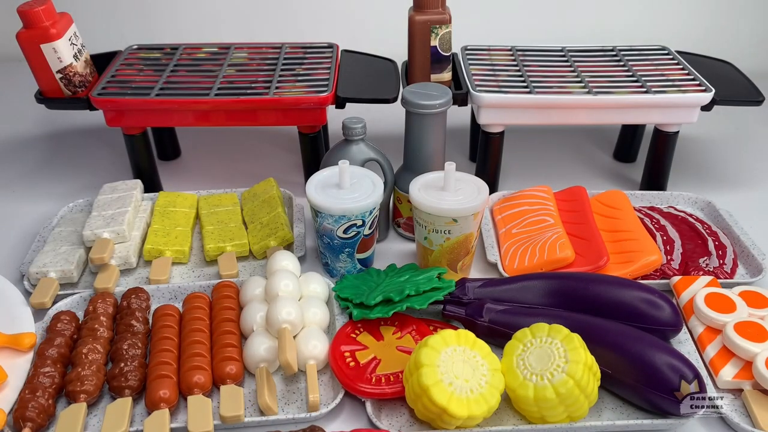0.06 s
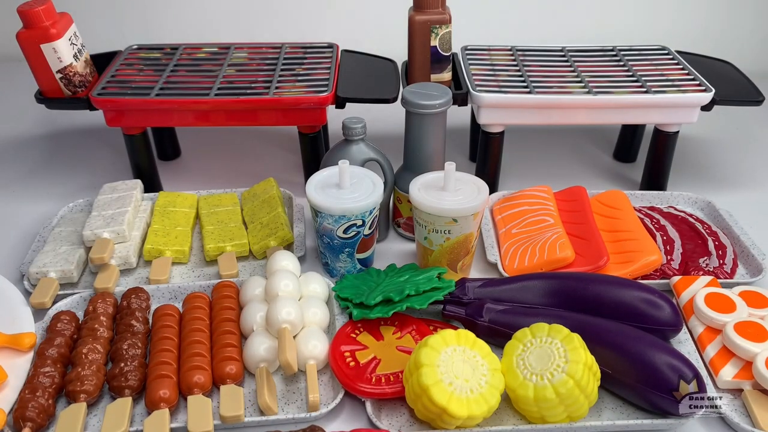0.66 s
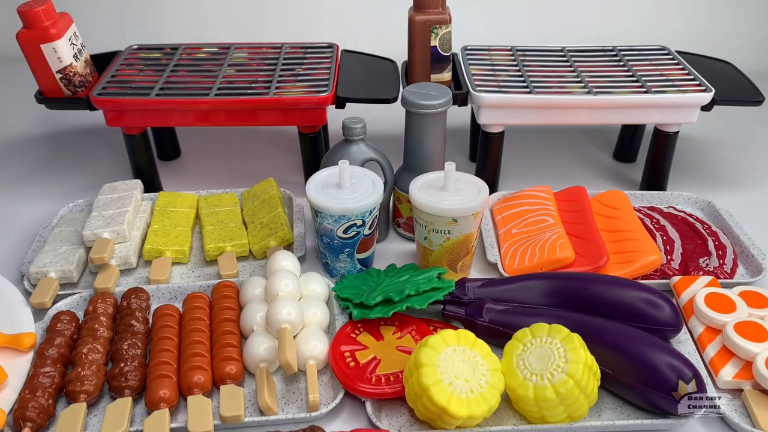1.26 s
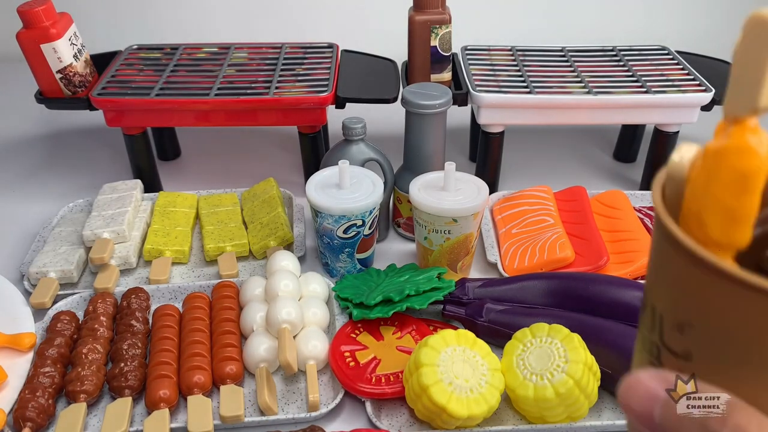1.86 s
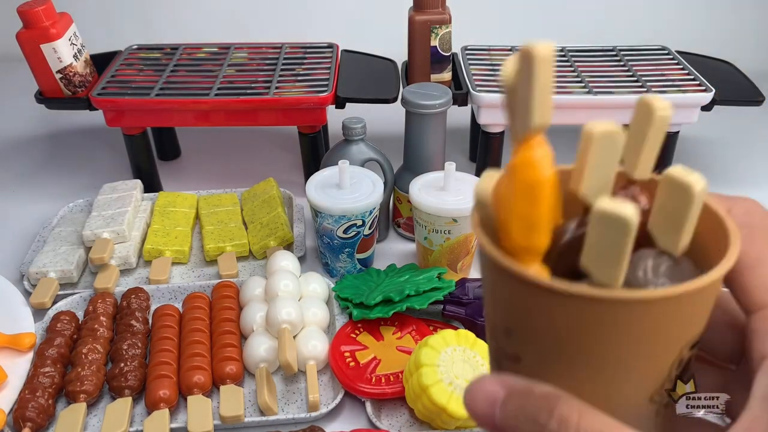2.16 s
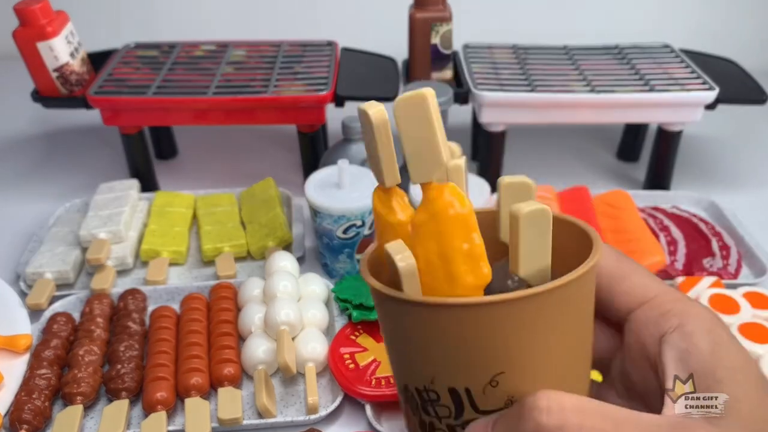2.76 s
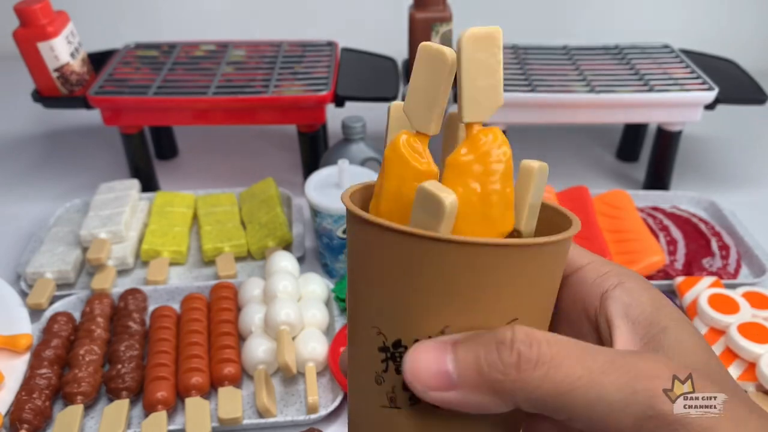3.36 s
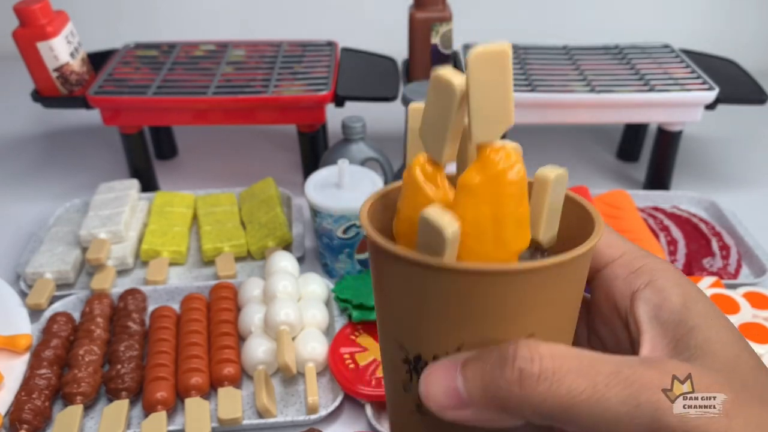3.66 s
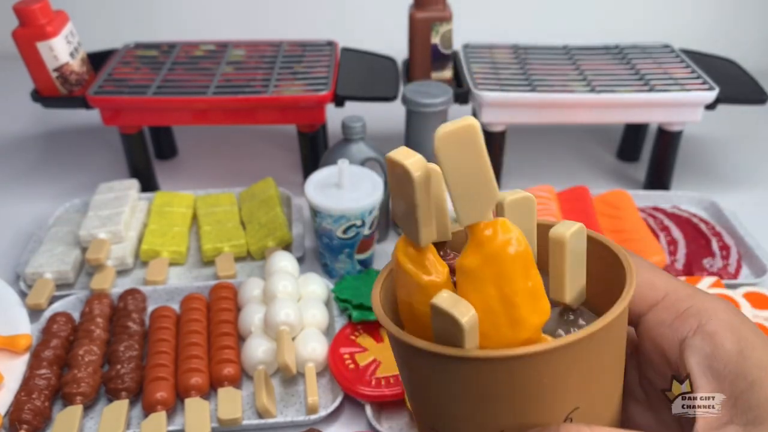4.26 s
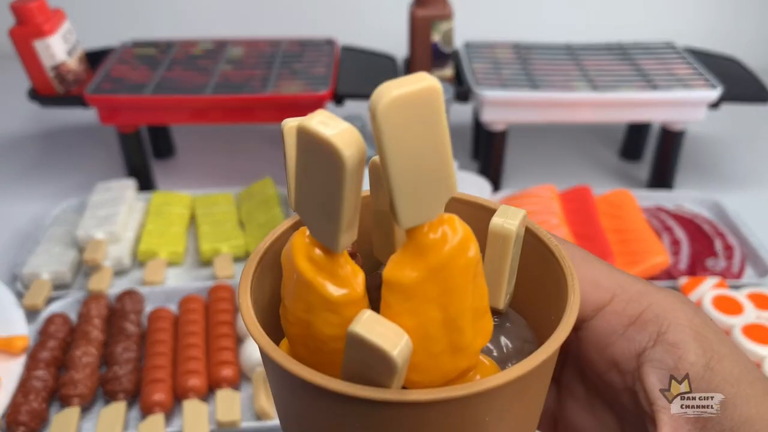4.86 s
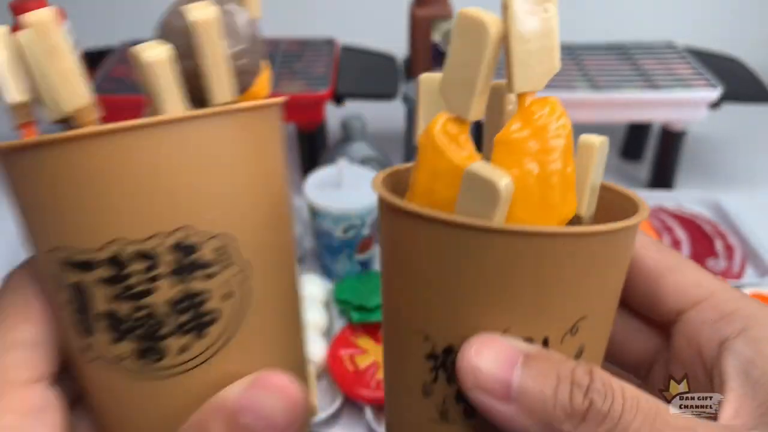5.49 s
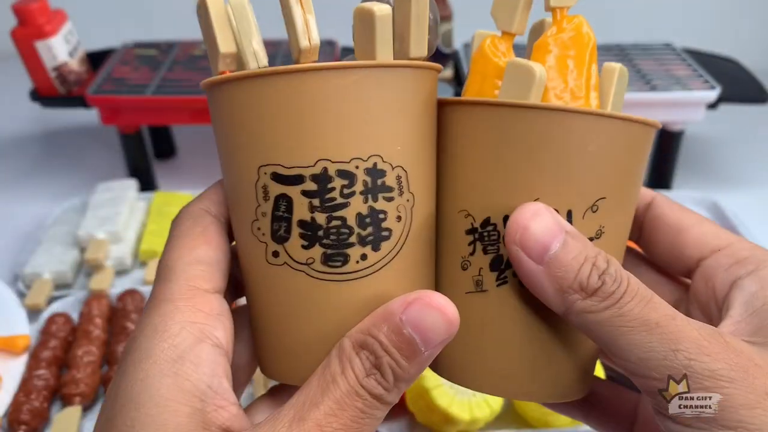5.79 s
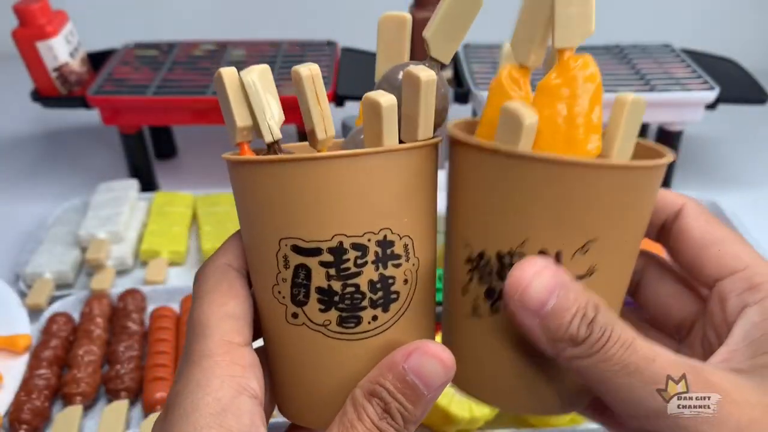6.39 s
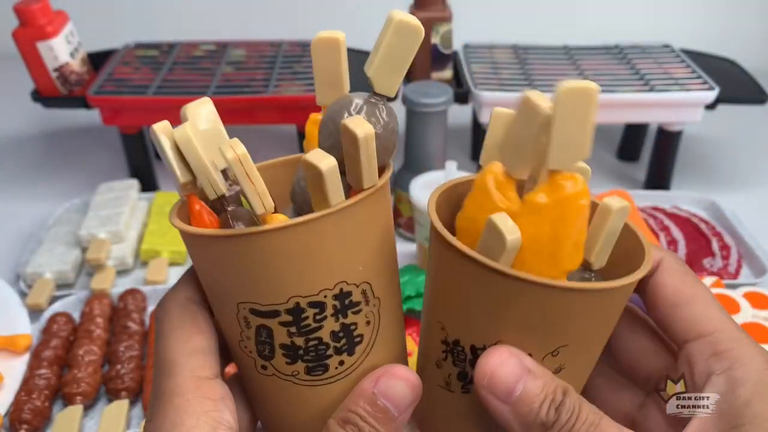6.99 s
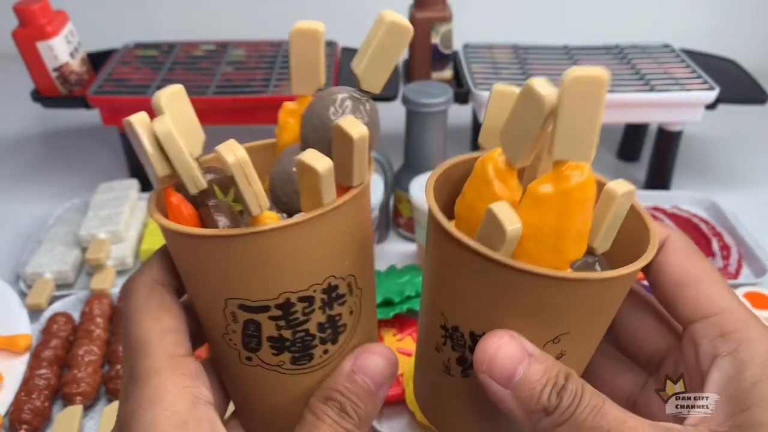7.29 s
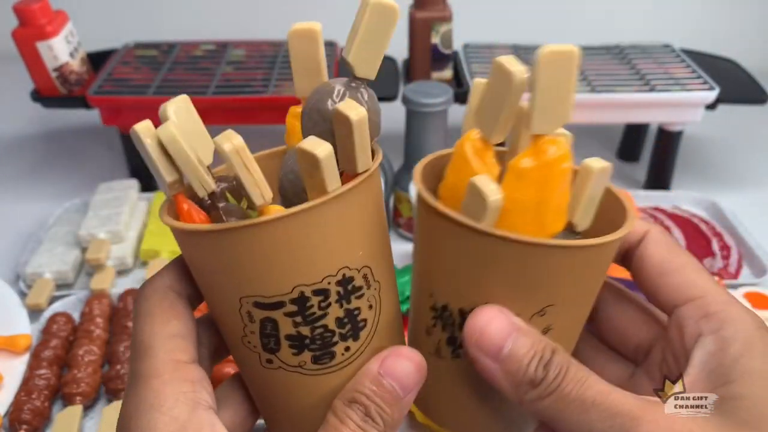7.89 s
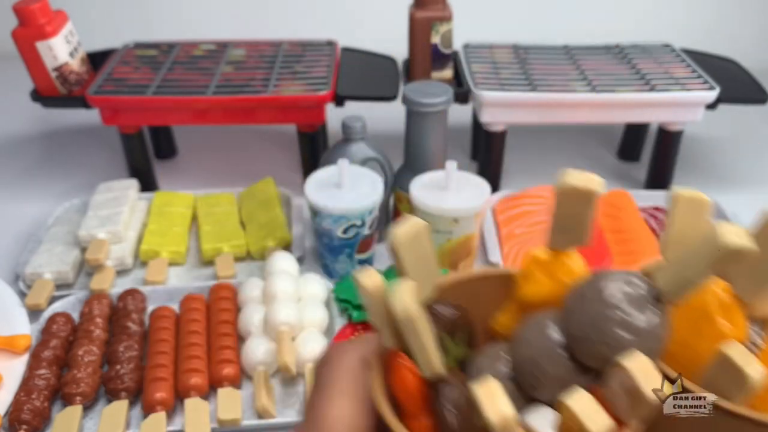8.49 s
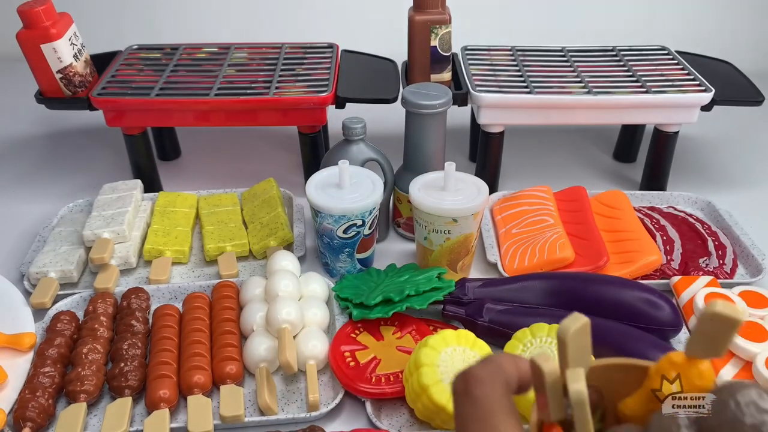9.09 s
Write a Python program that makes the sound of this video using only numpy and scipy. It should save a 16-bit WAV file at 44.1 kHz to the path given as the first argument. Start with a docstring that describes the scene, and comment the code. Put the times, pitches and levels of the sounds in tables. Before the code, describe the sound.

A small, quiet room holds a faint low rumble and hiss, with a soft swish and click around 0.5 seconds. From about 1 second, hollow plastic toy skewers clatter in a paper cup close to the microphone, slightly dull at first, with a light table bump near 1.5 seconds. Brighter, irregular clicks and small tumbles continue until 3 seconds and return from 3.4 to 4.2. Then fingers softly rub and drag on the paper, with a few sparse ticks. A brief swish near 5.7 seconds brings in a second cup, and louder, hollower clatter follows from 6 to 7 seconds. Lighter taps build to another strong rattle around 8.2 seconds. At about 8.8 seconds a cup lands on the table with a firm knock and low thud, then scrapes briefly as it slides. Each contact has a short room echo.

```python
"""Hollow plastic toy skewers clatter in two paper cups, lifted, turned and shaken close to a phone's mics.
Each contact rings the plastic and the cup's wall and hollow; fingers rub and drag on the paper.
An arm bumps the table now and then, and at the end a cup is put down on it and slid.
The place is a small, quiet room with a short echo, a low building rumble and a faint hiss."""
import sys
import numpy as np
from scipy import signal
from scipy.fft import rfft, irfft, next_fast_len
from scipy.io import wavfile
from scipy.ndimage import uniform_filter1d, map_coordinates

SR = 44100
rng = np.random.default_rng(int(sys.argv[2]) if len(sys.argv) > 2 else 0)


def generate_wav(signal):
    """Clip the signal to [-1, 1] and save it as 16-bit WAV at the path in sys.argv[1]."""
    frames = np.transpose(np.atleast_2d(signal))
    scaled = np.clip(frames, -1, 1) * 32767
    pcm = np.round(scaled).astype(np.int16)
    wavfile.write(sys.argv[1], SR, pcm)


N = 403074

# A skewer's plastic body. Each row: frequency in Hz, relative level in dB per Hz.
CLACK_SPECTRUM = [(100, -25.5), (250, -13.5), (500, 2), (800, -5.5), (1250, 3.5), (1900, 7), (2350, 0.5),
                  (3100, 3.5), (3700, 1.5), (4500, 5.5), (5600, -10.5), (7000, -9), (10000, -44.5)]
# A rubbed paper cup. Each row: frequency in Hz, relative level in dB per Hz.
PAPER_SPECTRUM = [(200, -22.5), (600, -8), (890, 8), (1070, 15.5), (1300, 8.5), (1700, 0.5), (2300, -4.5),
                  (3000, 3.5), (4000, 4.5), (5200, 2), (7000, 0.5), (10000, -6), (14000, -14.5),
                  (16000, -38)]
# The table top. Each row: frequency in Hz, level in dB, t60 in seconds.
TABLE_MODES = [(57.3, -33, 0.7), (83.5, -33, 0.66), (106, -30, 0.19), (174, -16.5, 0.16),
               (216.5, -26, 0.25), (279.3, -24.5, 0.24), (326, -26, 0.14), (394, -27, 0.16),
               (787, -47, 0.2), (975, -45, .12)]


def amp(db):
    return 10 ** (np.asarray(db) / 20)


def unit(x):
    return x / np.sqrt(np.mean(x ** 2) + 1e-20)


def along(points, hz):
    """Read (Hz, value) points on a log axis."""
    f, v = np.transpose(points)
    return np.interp(np.log(hz + 1), np.log(f), v)


def curve(rows):
    """(seconds, value) rows as one value per sample."""
    return np.interp(np.arange(N) / SR, *np.transpose(rows))


def wobble(rate):
    """A smooth random curve, rate knots a second."""
    knots = rng.standard_normal(int(N * rate / SR) + 4)
    steps = np.arange(0, len(knots) - 1, 1 / 10)
    return np.interp(np.arange(N) * rate / SR, steps, map_coordinates(knots, [steps]))


def swell(s, half):
    """A smooth rise and fall around time s."""
    return np.exp(-np.minimum(((np.arange(N) / SR - s) / half) ** 2, 30))


def decay(t, t60, attack):
    """A quick rise and an exponential fall."""
    return np.exp(-np.log(1000) * t / t60) * (1 - np.exp(-t / attack))


def add(out, s, x):
    """Mix x in from time s."""
    part = out[:, round(s * SR):][:, :x.shape[-1]]
    part += x[..., :part.shape[-1]]


def filtered(x, response):
    """x times a response of frequency."""
    m = next_fast_len(x.shape[-1] + 8192)
    return irfft(rfft(x, m) * response(np.fft.rfftfreq(m, 1 / SR)), m)[..., :x.shape[-1]]


def spread(hz):
    """Mid and side weights: the bass is alike at both mics, the treble is not."""
    # Each row: frequency in Hz, left-right likeness from 0 to 1.
    likeness = [(100, 0.92), (400, 0.71), (1100, 0.31), (2000, 0.12), (5000, 0.028)]
    turn = np.arccos(np.clip(along(likeness, hz), 0, 1)) / 2
    return np.array([np.cos(turn), np.sin(turn)])


def coloured(x, spectrum):
    """Two unrelated excitations become a stereo sound of rms 1 with this spectrum."""
    mid, side = filtered(x, lambda hz: amp(along(spectrum, hz)) * spread(hz))
    return unit(np.array([mid + side, mid - side]))


def patchy(depth_db):
    """Two noises whose narrow bands swell and fade on their own."""
    bands = signal.stft(rng.standard_normal((2, N)), nperseg=4096)[2]
    field = uniform_filter1d(rng.standard_normal(bands.shape[1:]), size=4, axis=0)
    field = uniform_filter1d(field, size=5, axis=1)
    return signal.istft(bands * amp(depth_db * unit(field)), nperseg=4096)[1][:, :N]


def narrow_noise(rows, width_hz):
    """Brief swells of narrow noise, alike at both mics."""
    out = np.zeros(N)
    for s, half, hz, db in rows:
        band = filtered(rng.standard_normal(N), lambda f: 1 / (1 + ((f - hz) / width_hz) ** 4))
        out += amp(db) * swell(s, half) * unit(band)
    return out


def blow(x):
    """Scale a stereo blow to the energy of 10 ms at rms 1."""
    return x / np.sqrt(np.sum(x ** 2) / 2 / (SR / 100))


def ring(hz, t60, attack, lead=0):
    """One resonance; its phase is lead seconds ahead at the left mic."""
    t = np.arange(SR // 20) / SR
    return blow(np.sin(2 * np.pi * hz * (t + np.array([[lead], [0]]))) * decay(t, t60, attack))


def modal(modes):
    """The ring of an object with (Hz, dB, t60) modes."""
    t = np.arange(SR // 2) / SR
    return sum(amp(db) * np.sin(2 * np.pi * hz * t) * decay(t, t60, 0.0019) for hz, db, t60 in modes)


def shell(spectrum, t60, attack, count):
    """A thin shell with many close modes; the returned strike() rings them at new strengths."""
    t = np.arange(SR // 20, dtype=np.float32) / SR
    hz = (np.arange(count) + rng.uniform(0.55, 1.536, count)) * spectrum[-1][0] / count
    life = t60 * np.exp(0.28 * rng.standard_normal((count, 1)))
    phase = np.float32(2 * np.pi * (hz[:, None] * t + rng.random((count, 1))))
    modes = np.sin(phase) * np.float32(decay(t, life, attack))
    weight = amp(along(spectrum, hz)) * spread(hz)

    def strike():
        mid, side = np.float32(weight * rng.standard_normal((2, count))) @ modes
        return blow(np.array([mid + side, mid - side]))
    return strike


def room_tone():
    """The building's wavering low rumble under a faint hiss."""
    # Each row: time in seconds, relative level in dB.
    rumble_levels = [(0, -61.5), (.8, -70), (1.55, -64.5), (2.3, -61.5), (3.1, -70.5), (4.6, -68.5),
                     (5.7, -66.5), (6.3, -72), (7, -67.5), (8.3, -66.5), (8.7, -85)]
    # Each row of both: frequency in Hz, relative level in dB per Hz.
    rumble_spectrum = [(25, -26), (55, 1.5), (80, -6.5), (120, -6), (190, -1.5), (280, -6), (400, -7.5),
                       (500, -16.5), (900, -25.5), (2000, -48.5)]
    hiss_spectrum = [(100, 8.5), (500, 4.5), (1100, -5), (2000, -5.5), (3000, -9), (4500, -21.5),
                     (8000, -17.5), (14500, -15.5), (15500, -41.5)]
    rumble_db = curve(rumble_levels) - 3.5 + 1.5 * wobble(rate=5)
    rumble = amp(rumble_db) * coloured(patchy(depth_db=2.5), rumble_spectrum)
    return rumble + amp(-71.5) * coloured(rng.standard_normal((2, N)), hiss_spectrum)


def effort():
    """Strength of the handling in dB: each spell rises, holds and dies away; the grip is never even."""
    # Turning and shaking. Each row: start in seconds, end in seconds, strength in dB.
    handling = [(1.179, 1.219, -52), (1.3, 1.71, -70.5), (1.788, 2.1, -59), (2.148, 2.405, -59.5),
                (2.45, 2.6, -58.5), (2.7, 2.92, -66.5), (3.423, 3.955, -60), (4.117, 4.18, -70),
                (4.922, 5.027, -62), (6.203, 6.957, -56), (7.43, 7.613, -62.5), (7.75, 8.1, -74),
                (8.207, 8.276, -40.5), (8.717, 8.75, -55)]
    rise_db_per_s, fall_db_per_s, rest_db = 304.5, 118, -81.5
    t = np.arange(N) / SR
    start, end, db = np.transpose(handling)[:, :, None]
    before, after = np.maximum(start - t, 0), np.maximum(t - end, 0)
    spells = db - rise_db_per_s * before - fall_db_per_s * after
    return np.maximum(spells.max(axis=0), rest_db) + wobble(rate=7.9)


def rubbing(effort_db):
    """Fingers and skewers shift on the paper: a fine hiss with tiny slips in it."""
    slips_per_s = 420
    slips = (rng.random(N) < slips_per_s / SR) * amp(4.9 * rng.exponential(size=N).clip(0, 4))
    grains = signal.fftconvolve(slips, decay(np.arange(SR // 20) / SR, t60=0.069, attack=.0006))[:N]
    grip = unit(0.41 + unit(grains))
    return amp(effort_db - 3) * coloured(grip * rng.standard_normal((2, N)), PAPER_SPECTRUM)


def rattles(effort_db):
    """Skewers that shift in the cup also jostle: many tiny dull taps."""
    out = np.zeros((2, N))
    tap = shell(CLACK_SPECTRUM[:-5], t60=0.014, attack=0.0004, count=40)
    for place, size in rng.random((420, 2)):
        add(out, place * N / SR, amp(effort_db[int(place * N)] - 9.0 + 9.8 * size) * tap())
    return out


def table_bumps():
    """A soft arm stirs only the table's two lowest modes; a cup's hard base stirs them all."""
    # Each row: start in seconds, level in dB.
    arm_bumps = [(.01, -72), (.55, -63.5), (2.27, -71), (4.499, -67), (6.479, -70), (6.93, -56),
                 (7.38, -67), (7.89, -61)]
    out = np.zeros((2, N))
    t = np.arange(SR // 2) / SR
    lowest, second = (np.sin(2 * np.pi * hz * t) for hz, _, _ in TABLE_MODES[:2])
    boom = (lowest + 0.52 * second) * decay(t, t60=1.0, attack=.012)
    for s, db in arm_bumps:
        add(out, s, amp(db) * boom)
    add(out, 1.459, amp(-33.5) * modal(TABLE_MODES))  # the cup nudges the table as it is lifted
    return out


def rumble_swells():
    """The low rumble swells briefly in a narrow band."""
    # Each row: peak time in seconds, half length in seconds, frequency in Hz, level in dB.
    swells = [(0.048, .09, 215, -63), (1.56, .08, 245, -65), (1.86, 0.11, 353, -66), (2.3, .08, 185, -63),
              (5.18, 0.11, 225, -68), (5.72, 0.093, 315, -67), (7.621, .09, 270, -69)]
    return narrow_noise(swells, width_hz=55)


def squeaks():
    """A fingertip squeaks softly on the paper."""
    # Each row: peak time in seconds, half length in seconds, frequency in Hz, level in dB.
    fingertip_slips = [(.09, .05, 2880, -80), (4.558, .01, 4600, -62)]
    return narrow_noise(fingertip_slips, width_hz=170)


def strokes():
    """A hand or cup slides with a smooth swish, some bright, some dull."""
    # Each row: peak time in seconds, half length in seconds, level in dB, tilt in dB per octave.
    slides = [(0.417, 0.11, -68.5, -2.5), (0.5, 0.049, -54, 0), (1.062, 0.011, -52.5, 2),
              (1.106, .03, -57, -2.5), (1.447, 0.0089, -51, -0.5), (3.317, .014, -63, 9),
              (4.328, 0.15, -65, -2.5), (4.614, 0.032, -57, -1), (4.798, 0.16, -64.5, -2.5),
              (4.936, 0.025, -49.5, -0.5), (5.009, 0.02, -45.5, -1.5), (5.166, 0.061, -51.5, 3.5),
              (5.448, .03, -65.5, -0.5), (5.747, 0.012, -37, -3)]
    # Each row: frequency in Hz, relative level in dB per Hz.
    swish_spectrum = [(100, -33), (500, -7.5), (1200, -3), (2200, -6.5), (2900, 1.5), (3400, -9.5),
                      (4000, -4), (5200, -3), (6600, -6.5), (9000, -2), (13500, -15.5), (16000, -34.5)]
    out = np.zeros((2, N))
    for s, half, db, tilt_db in slides:
        t = np.arange(-3 * half, 3 * half, 1 / SR)
        colour = [(hz, level + tilt_db * np.log2(hz)) for hz, level in swish_spectrum]
        swish = coloured(rng.standard_normal((2, len(t))), colour)
        add(out, s + t[0], amp(db) * np.exp(-(t / half) ** 2) * swish)
    return out


def contacts():
    """A skewer taps once, or topples: it touches a neighbour, lands and takes others with it."""
    # Each row: start in seconds, then clack, tick and cup levels in dB.
    taps = [(.466, -45.5, -49.5, -79), (1.0206, -62, -64, -61), (1.1284, -47.5, -40, -62.5),
            (1.213, -45, -42, -47), (1.2632, -42, -36, -55), (1.3541, -46.5, -39.5, -61),
            (1.4566, -40, -38, -39.5), (1.5785, -57.5, -51.5, -75), (1.7218, -56, -51.5, -64),
            (1.784, -59.5, -66.5, -54), (1.8237, -47.5, -51, -55), (1.9313, -64.5, -52.5, -47.5),
            (1.9402, -39, -52, -43), (1.952, -41.5, -39.5, -50.5), (1.9895, -48, -54, -48),
            (2.0636, -53, -50, -54), (2.0797, -37.5, -44.5, -49.5), (2.0963, -44, -43, -42.5),
            (2.115, -49, -59, -51), (2.143, -45, -58, -47), (2.151, -49, -61, -49),
            (2.188, -42, -45, -42.5), (2.2257, -52, -56, -50), (2.245, -52, -56, -50),
            (2.2669, -47, -44, -52), (2.2775, -42, -45, -53), (2.311, -51, -53, -49),
            (2.3956, -52.5, -47, -49), (2.412, -43.5, -43, -48), (2.419, -45, -43, -49),
            (2.4265, -40, -44, -49), (2.4622, -51, -52, -51), (2.5245, -48, -48, -44.5),
            (2.616, -48, -48, -48), (2.638, -49, -45, -54), (2.7541, -50, -66, -47),
            (2.7867, -50, -48, -50), (2.958, -40.5, -34, -57), (2.9693, -42, -45.5, -46.5),
            (3.4475, -47, -47, -64), (3.482, -53.5, -47, -70), (3.5083, -56, -52, -64),
            (3.5398, -54, -39, -59), (3.6065, -43.5, -40, -50), (3.6674, -60, -41, -74),
            (3.698, -40, -40.5, -50), (3.7312, -44.5, -45, -55), (3.748, -51, -50, -50),
            (3.7811, -53, -48, -62), (3.809, -36.5, -35, -52), (3.8533, -46.5, -34, -53),
            (3.9293, -58, -54, -63), (3.9638, -48, -48.5, -61), (3.9972, -43, -45, -52),
            (4.1567, -43.5, -43, -54), (4.37, -47.5, -61.5, -78), (4.5975, -50.5, -60, -82),
            (4.738, -58, -66, -68), (4.8052, -58, -58, -66), (4.9091, -46, -39.5, -76),
            (5.364, -66, -70, -63), (5.379, -63, -76, -63.5), (6.082, -40, -39, -41),
            (6.108, -44, -42, -43), (6.1387, -43, -46, -32.5), (6.1752, -35.5, -30.5, -38),
            (6.2091, -38, -44, -42), (6.4782, -27, -27.5, -38), (6.605, -47.5, -38, -62),
            (6.655, -37.5, -35.5, -44), (6.7803, -33, -32.5, -39), (6.788, -47.5, -36, -38.5),
            (6.798, -39, -47, -44), (7.0595, -45.5, -41, -61), (7.067, -42, -53, -46.5),
            (7.2142, -55.5, -58.5, -63), (7.398, -54, -42, -62), (7.4792, -47.5, -48, -57),
            (7.517, -48.5, -46, -59), (7.7253, -32, -45.5, -30), (7.8374, -44, -41, -47.5),
            (7.8828, -35, -38.5, -33.5), (7.901, -49, -53, -46), (7.987, -43, -41.5, -50),
            (8.0341, -31, -34.5, -26), (8.173, -42, -55, -40), (8.1913, -26, -23.5, -31),
            (8.202, -35, -28.5, -28.5), (8.3052, -43, -41.5, -32), (8.366, -51, -48.5, -46),
            (8.5836, -57.5, -63, -59.5), (8.743, -50.5, -61.5, -38)]
    # Each row: landing in seconds, lead of the touch in ms, touch, clack, tick and cup levels in dB,
    # looseness of the landing in ms.
    topples = [(1.165, 15.5, -29, -33.5, -24.5, -35.5, 2.12), (1.8621, 10, -39, -35, -29, -44, 0.99),
               (2.006, 7.5, -35, -36, -28, -45.5, 1.8), (2.1703, 10, -39.5, -33, -26.5, -45.5, 0.86),
               (2.3346, 15, -37.5, -37, -28.5, -42.5, 1.18), (2.4811, 11, -38.5, -35.5, -27.5, -44.5, 1.2),
               (2.567, 9.1, -45.5, -37, -30.5, -51, 1), (2.6479, 24, -38.5, -41.5, -27.5, -46, 2),
               (3.565, 4.6, -35.5, -36.5, -28, -42.5, 0.8), (4.0918, 20.5, -42, -36, -28.5, -45.5, 1.8),
               (4.989, 5.6, -43.5, -39, -45.5, -43.5, 3.8), (5.729, 2.9, -44.5, -38, -43, -37.5, 3.7),
               (6.0493, 20.8, -34, -24.5, -23.5, -24, 7), (6.342, 16.5, -33, -31.5, -36, -26.5, 7.4),
               (6.466, 10.8, -29.5, -35, -33, -22.5, 2.4), (6.636, 37, -32.5, -29.5, -29.5, -30.5, 8),
               (6.7736, 15.7, -32, -35.5, -40, -36.5, 4.7), (6.917, 29, -43.5, -32, -28, -35.5, 4.5),
               (8.157, 14.3, -34, -37, -52, -32, 1.5)]
    # One landing. Each row: delay as a share of the looseness, plastic gain in dB, cup gain in dB.
    cascade = [(-.55, -10, -20.5), (0, -1, 0), (0.598, -7, -9.5), (1.299, -9.5, -29)]
    rows = list(taps)
    for s, ahead_ms, touch_db, clack_db, tick_db, cup_db, loose_ms in topples:
        rows.append((s - ahead_ms / 1000, touch_db - 5.5, touch_db, touch_db - 11))  # mostly tick
        for share, plastic_db, hollow_db in cascade:
            landing_s = s + share * loose_ms / 1000
            rows.append((landing_s, clack_db + plastic_db, tick_db + plastic_db, cup_db + hollow_db))
    return rows


def graze(rise):
    """Plastic scrapes briefly along its neighbour, louder up to the moment it catches."""
    t = np.arange(SR // 40) / SR
    return blow(rng.standard_normal((2, len(t))) * np.exp(-t / rise)[::-1])


def hollow(hz, t60):
    """The air in a struck cup; its short upper modes take a new strength and pitch at each blow."""
    # Each row, against the lowest mode: frequency ratio, level in dB, share of the ring time.
    air_modes = [(1, 0, 1), (1.08, -10, 0.65), (1.42, -13.5, .45), (1.77, -19, 0.51)]
    detune, scatter_db = 0.048, 4
    out = 0
    for k, (ratio, db, life) in enumerate(air_modes):
        louder, higher = rng.standard_normal(2).clip(-2, 2) * (k > 0)
        mode = ring(hz * ratio * (1 + detune * higher), t60=t60 * life, attack=0.0022, lead=.00006)
        out = out + amp(db + scatter_db * louder) * mode
    return out * amp([[1.2], [-1.2]])  # a little left of centre


def skewers():
    """Each contact rings one skewer's body, tip and thin handle, and the wall and hollow of the cup."""
    # Hard tip, paper wall and the edge of a hard contact.
    # Each row: frequency in Hz, relative level in dB per Hz.
    tick_spectrum = [(3500, -59), (5500, -0.5), (6700, -1), (8000, 0), (9300, 0), (10100, 0), (11000, -6),
                     (12200, -2.5), (13500, -2), (15300, -24), (16300, -36.5)]
    wall_spectrum = [(90, -16), (180, -10), (300, -13.5), (480, 1.5), (700, 1), (950, 0), (1300, -15),
                     (2000, -26)]
    snap_spectrum = [(11000, -54.5), (13500, 1.5), (15000, 0), (16300, -5.5)]
    # Each cup: hollow pitch in Hz, its scatter as a share, its t60 in seconds,
    # handle ping in Hz, its scatter in Hz, its level against the tick in dB.
    first_cup = (1190, 0.1, 0.07, 8966, 78.5, -7.5)
    second_cup = (1072.5, 0.03, .026, 4255, 274.5, -14)
    second_cup_s, snap_full_db = 4.85, -23
    out, grazes = np.zeros((2, 2, N))
    bodies = [shell(CLACK_SPECTRUM, t60=0.034, attack=0.00064, count=130) for _ in range(5)]
    tips = [shell(tick_spectrum, t60=.025, attack=.0013, count=130) for _ in bodies]
    walls = [shell(wall_spectrum, t60=0.072, attack=0.00074, count=36) for _ in bodies]
    snap = shell(snap_spectrum, t60=.009, attack=.0003, count=130)
    for s, clack_db, tick_db, cup_db in contacts():
        cup = first_cup if s < second_cup_s else second_cup
        hollow_hz, scatter, hollow_t60, ping_hz, ping_scatter_hz, ping_db = cup
        cup_hz = hollow_hz * (1 + scatter * rng.standard_normal())
        which, *neighbours = rng.permutation(len(bodies))[:4]
        ping = ring(ping_hz + ping_scatter_hz * rng.standard_normal(), t60=0.03, attack=0.00081)
        air = hollow(cup_hz, hollow_t60)
        add(out, s, amp(clack_db) * bodies[which]() + amp(tick_db) * tips[which]())
        add(out, s, amp(tick_db + ping_db) * ping + amp(cup_db) * air + amp(cup_db - 10) * walls[which]())
        # each contact gives a short, hollow plastic pop at a random pitch
        pop_hz = 1900 * 2 ** (.4 * rng.standard_normal())
        add(out, s, amp(clack_db - 14) * ring(pop_hz, t60=.014, attack=.0005, lead=.0001))
        tip_ring = ring(10190 + 130 * rng.standard_normal(), t60=0.021, attack=.0008)
        snap_db = tick_db - 17 + min(tick_db - snap_full_db, 0)  # soft contacts lose their edge
        add(out, s, amp(tick_db - 13) * tip_ring + amp(snap_db) * snap())
        # a hard blow jolts the neighbouring skewers into a quick chatter
        jolt = amp(-5.5 + 2.3 * min(clack_db + 33, 0))
        delays = np.cumsum(rng.uniform(0.00099, .005, len(neighbours)))
        for other, delay in zip(neighbours, delays):
            chatter = amp(clack_db) * bodies[other]() + amp(tick_db) * tips[other]()
            add(out, s + delay, jolt * np.exp(-delay / 0.019) * chatter)
        scrape = np.hypot(amp(clack_db), amp(tick_db)) * graze(rise=0.0089)
        add(grazes, s - scrape.shape[1] / SR, amp(-20.0) * scrape)
    return out + filtered(grazes, lambda hz: amp(along(PAPER_SPECTRUM, hz)))


def brought_in(x):
    """The clatter starts dull, off to the side, and brightens as the first cup comes round on mic."""
    # Each row: time in seconds, share of the sound that is dulled.
    off_mic = [(1.5, 1), (1.95, 0.25)]
    # Each row: frequency in Hz, gain off to the side in dB.
    shade = [(8000, -2.5), (11000, -8), (14000, -15)]
    away = curve(off_mic).clip(0, 1)
    return (1 - away) * x + away * filtered(x, lambda hz: amp(along(shade, hz)))


def rubbed_modes(modes, rough_db):
    """Uneven friction through resonances of alternating sign, at rms 1."""
    def body(f):
        return sum((-1) ** k * amp(db) * 1j * f * width / (hz * hz - f * f + 1j * f * width)
                   for k, (hz, width, db) in enumerate(modes))
    friction = amp(rough_db * wobble(rate=110)) * rng.standard_normal((2, N))
    mid, side = filtered(friction, lambda f: body(f) * spread(f))
    return unit(np.array([mid + side, mid - side]))


def drags():
    """A finger or skewer drags along a cup and rings its hollow and its paper wall."""
    # Each row: peak time in seconds, half length in seconds, hollow level in dB, wall level in dB.
    moves = [(1.13, 0.07, -55, -70), (4.256, 0.05, -64.5, -61), (4.436, 0.061, -61.5, -65.5),
             (4.563, .012, -66, -60), (4.627, 0.06, -68, -63), (4.747, 0.031, -67, -65.5),
             (4.888, 0.027, -64, -63), (4.964, 0.056, -56.5, -58), (5.011, 0.031, -57, -48.5),
             (5.201, 0.039, -64.5, -58), (5.766, 0.0074, -45, -44), (5.838, 0.029, -55, -72.5),
             (5.944, .03, -61.5, -82.5), (6.075, 0.034, -39.5, -35.5), (6.959, .018, -49, -46.5),
             (8.222, 0.016, -42, -33.5), (8.328, 0.046, -41.5, -47)]
    # Each row of both: frequency in Hz, width in Hz, relative level in dB.
    air_modes = [(1069, 62, 0)]
    wall_modes = [(2020, 90, -8), (2917, 130, -1), (3820, 110, 2), (4040, 270, -7), (4560, 150, -2),
                  (5800, 290, -7), (6330, 360, -10)]
    s, half, hollow_db, wall_db = np.transpose(moves)[:, :, None]
    swells = swell(s, half)
    air = (amp(hollow_db) * swells).sum(axis=0) * rubbed_modes(air_modes, rough_db=3.0)
    wall = (amp(wall_db) * swells).sum(axis=0) * rubbed_modes(wall_modes, rough_db=3.0)
    return air + wall


def ringing_pieces():
    """A loose piece rings on after a blow; once, a handle slips off the rim and twangs."""
    # Each row of both: frequency in Hz, level in dB, t60 in seconds.
    loose_modes = [(1195, -44, 0.14), (1247, -36, 0.07), (1410, -27, 0.022), (1464, -28, 0.038),
                   (1660, -33.5, 0.1), (1756, -34.5, 0.071)]
    twang_modes = [(3700, -43, 0.14), (4050, -45, .14)]
    # Each row: start in seconds, gain in dB.
    loose_hits = [(1.457, 1), (7.727, -3)]
    out = np.zeros((2, N))
    for s, db in loose_hits:
        add(out, s, amp(db) * modal(loose_modes))
    add(out, 4.997, modal(twang_modes))
    return out


def far_tone():
    """A brief, unsteady tone far off, with a weak octave above it."""
    # Each row: time in seconds, relative level in dB.
    levels = [(5.22, -100), (5.3, -68), (5.42, -67), (5.52, -80), (5.68, -64), (5.8, -100)]
    pitch_hz = 598 + 12 * wobble(rate=70)
    phase = 2 * np.pi * np.cumsum(pitch_hz) / SR
    level_db = curve(levels) - 3.0 + 5.2 * wobble(rate=25)
    return amp(level_db) * (np.sin(phase) + amp(-14.5) * np.sin(2 * phase))


def put_down():
    """The cup lands rim first and rocks flat; the table booms, then the cup scrapes in small slips."""
    # Each row of both: time in seconds, level in dB.
    landing = [(8.821, -19.5), (8.824, -19.5), (8.8325, -27.5)]
    slide = [(9.008, -53), (9.018, -41.5), (9.04, -32.5), (9.07, -35), (9.1, -41), (9.14, -36)]
    # Each row of both: frequency in Hz, relative level in dB per Hz.
    knock_spectrum = [(120, -12), (250, 6.5), (450, -7.5), (620, -1.5), (820, 1), (1080, -10), (1500, -7.5),
                      (2100, -14), (3000, -13.5), (4400, -14), (5500, -20.5), (8000, -21), (14000, -32.5),
                      (15500, -56)]
    scrape_spectrum = [(40, -31.5), (110, -7.5), (190, 4), (280, -0.5), (400, 3.5), (490, -8), (600, 3),
                       (720, -5.5), (1080, -2.5), (1400, -15.5), (3800, -17), (5200, -29), (7000, -28),
                       (14000, -43), (15500, -45.5)]
    out = np.zeros((2, N))
    knock = shell(knock_spectrum, t60=0.034, attack=0.0011, count=300)
    for s, knock_db in landing:
        add(out, s, amp(knock_db) * knock())
    add(out, landing[0][0], amp(-22.0) * ring(1046, t60=0.027, attack=0.0015))  # the cup's hollow
    add(out, landing[1][0], modal(TABLE_MODES))
    slips = amp(0.84 * wobble(rate=170)) * rng.standard_normal((2, N))
    sliding = np.arange(N) / SR > slide[0][0]
    return out + sliding * amp(curve(slide)) * coloured(slips, scrape_spectrum)


def room(x, gap_s=.004):
    """Near walls answer after a short gap; a new echo every half second stands for the cups moving."""
    # Each row: frequency in Hz, t60 in seconds.
    decay_times = [(150, 0.31), (600, 0.33), (1400, 0.28), (3700, 0.32), (9700, 0.33), (15000, 0.31)]
    # Each row: frequency in Hz, echo gain in dB.
    echo_gains = [(100, -2), (500, -8), (1100, -9), (2000, -7), (4500, -7), (9000, -11), (15000, -12)]
    out, step = np.zeros((2, N)), SR // 2
    for start in range(0, N, step):
        hz, t, bands = signal.stft(rng.standard_normal((2, SR // 3)), SR, nperseg=256)
        tail = signal.istft(bands * amp(-60 * t / along(decay_times, hz)[:, None]), SR, nperseg=256)[1]
        tail /= np.linalg.norm(tail[0])
        mid, side = filtered(tail, lambda f: amp(along(echo_gains, f)) * spread(f))
        echo = signal.fftconvolve(x[:, start:start + step], [mid + side, mid - side], axes=1)
        add(out, start / SR + gap_s, echo)
    return out


def scene():
    """The cups close to the mics, the room's answer and the quiet background."""
    effort_db = effort()
    clatter = brought_in(skewers() + ringing_pieces())
    near = clatter + rattles(effort_db) + put_down() + strokes() + drags() + squeaks()
    foreground = near + room(near) + rubbing(effort_db) + table_bumps()
    return foreground + room_tone() + far_tone() + rumble_swells()


def record(dry):
    """The phone cuts deep bass and top treble; the left's highs are mostly the right's, a little late."""
    low_cut_hz, top_hz, lag_s = 42, 16300, 13 / SR
    left, right = signal.sosfilt(signal.butter(4, low_cut_hz, "highpass", fs=SR, output="sos"), dry)
    blend = lambda hz: np.pi / 2 * np.clip((hz - 5000) / 4200, 0, .82)
    own = filtered(left, lambda hz: np.cos(blend(hz)))
    borrowed = filtered(right, lambda hz: np.sin(blend(hz)) * np.exp(-2j * np.pi * hz * lag_s))
    return filtered(np.array([own + borrowed, right]), lambda hz: hz < top_hz)


dry = scene()
out = record(dry)
generate_wav(out)
```